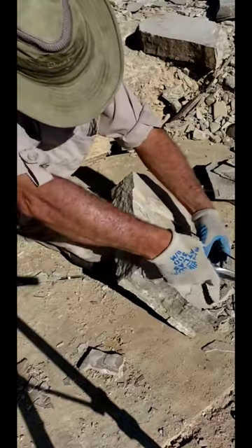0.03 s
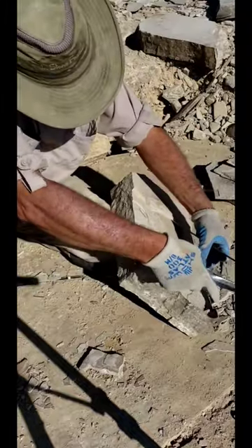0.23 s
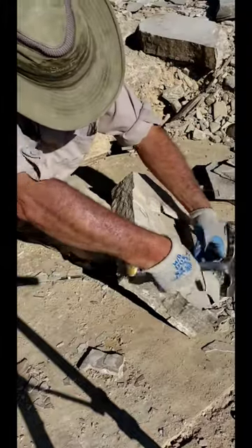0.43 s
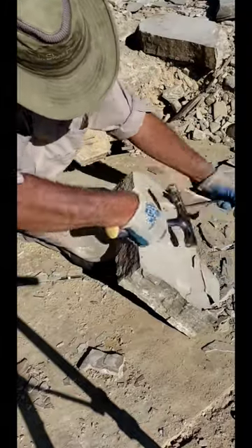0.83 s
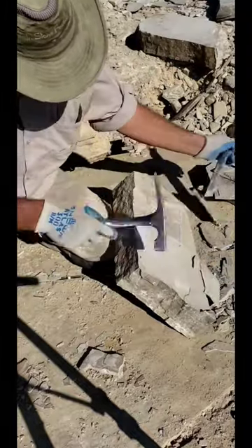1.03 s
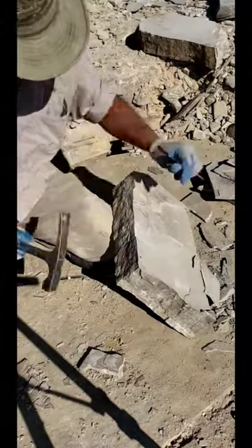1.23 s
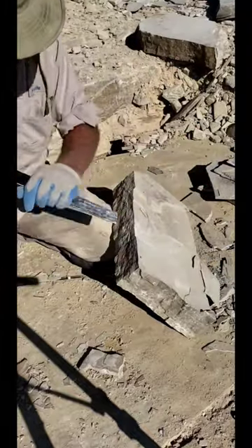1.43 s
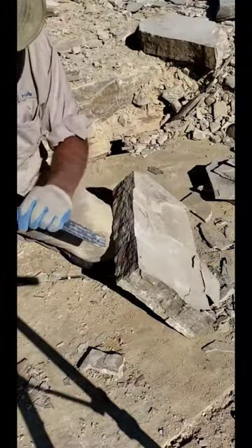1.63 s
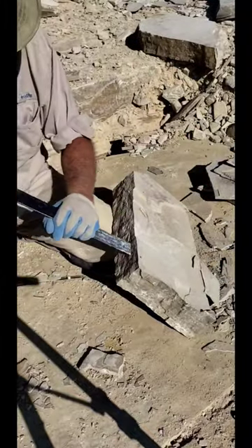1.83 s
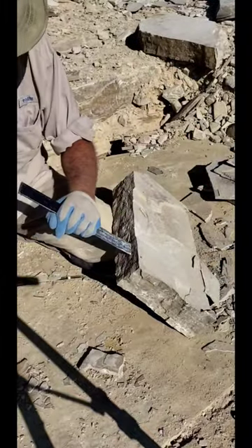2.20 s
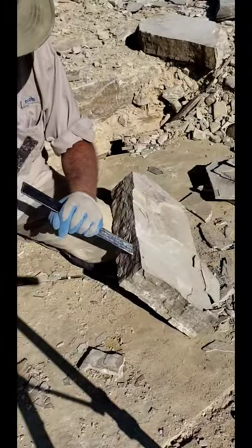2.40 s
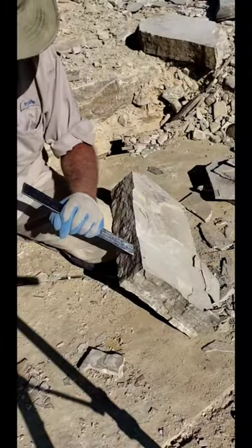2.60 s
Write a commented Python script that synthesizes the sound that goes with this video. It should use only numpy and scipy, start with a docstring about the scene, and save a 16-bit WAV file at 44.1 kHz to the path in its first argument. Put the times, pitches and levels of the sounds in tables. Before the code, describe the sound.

Close by in a quiet quarry, two ringing hammer blows drive a chisel into stone. Gritty scraping and tool knocks follow, then a pause and a last, duller blow, while an engine hums faintly far away.

```python
"""A quiet quarry, with a stereo microphone close to a stone slab and the work a little to the left.
A hammer drives a steel chisel into the slab: each blow cracks, rings and crumbles a little stone.
Between the blows the tools scrape over the slab, are put down, and the chisel is set again.
Rock faces return a faint echo; an engine hums far away."""
import sys
import numpy as np
from scipy import signal
from scipy.fft import rfft, irfft
from scipy.io import wavfile

SR = 44100
rng = np.random.default_rng(int(sys.argv[2]) if len(sys.argv) > 2 else 0)


def bounce(signal):
    """Save signal as a 16-bit WAV file at the path given by the first command-line argument."""
    frames = np.transpose(np.atleast_2d(signal))
    limited = np.clip(frames, -1, 1)
    pcm = np.round(limited * 32767).astype(np.int16)
    wavfile.write(sys.argv[1], SR, pcm)


N = 121275
LEAD = SR // 4   # samples ahead of time zero, room for an earlier blow
TIME = np.arange(-LEAD, N) / SR

# the slab's dull thud under the chisel: frequency_hz, level_db
THUD_SPECTRUM = [(50, -26.5), (90, -6.5), (120, 5), (220, -8), (400, -14.5), (900, -30), (3000, -58.5)]
THUD_T60_S = 0.17


def hammer_blows():
    """Close up, steel ticks on steel, the chisel rings, the stone cracks and thuds, and grit crumbles."""
    # the blows, the first heard only by its echo: start_s, ring_db, ring_rise_s, ring_hold_s, ring_t60_s,
    # twin_db, modes_db, crack_db, crumble_db, crumble_rise_s, crumble_hold_s, thud_db, stone_hz, stone_db
    blows = [(-.1, -14.5, 0.0011, 0.012, .1, -5, -22, -19, -24, 0.0064, 0.016, -40.5, 1100, -25),
             (0.216, -16.5, .004, .018, 0.069, -9, -24, -21, -24.5, 0.0021, .016, -38, 1064, -23.5),
             (0.502, -15, 0.00047, 0.00091, .11, -23, -17.5, -25.5, -23.5, 0.008, 0.028, -44.5, 1245, -26.5),
             (2.467, -26.5, .002, 0.0016, 0.12, -15, -29, -17, -26.5, 0.0016, 0.0072, -39.5, 810, -31)]
    # the chisel's other modes, damped by the hand like its main ring: pitch_hz, level_db
    chisel_modes = [(1593, -23), (2181, -24.5), (3403, -21), (4046, -10), (5150, -18), (6405, -21.5),
                    (7210, -22), (7400, -17), (8122, -19.5), (9089, -17), (9305, -16.5), (11085, -14.5),
                    (12738, -15), (13102, -19.5), (13905, -18.5)]
    # cracking stone: frequency_hz, level_db
    crack_spectrum = [(100, -14), (250, 7), (620, -3.5), (1000, -4.5), (1500, -7.5), (3000, -1.5),
                      (5500, 3), (8000, -0.5), (12000, 1.5), (14500, 4.5), (16000, -9)]
    # grit crushed under the edge: frequency_hz, level_db
    crumble_spectrum = [(150, -21.5), (600, -2.5), (1200, -7.5), (2200, 2), (4300, -8.5), (5100, 4.5),
                        (6200, -8.5), (7300, -1.5), (9500, 1.5), (13000, 0.5), (14500, -4), (16000, -22.5)]
    chisel_hz, beat_hz = 3591, 105   # the second bending plane rings a little higher: a beating twin
    out = np.zeros((2, len(TIME)))
    for (start, ring_db, rise, hold, t60, twin_db, modes_db, crack_db,
         crumble_db, crumble_rise, crumble_hold, thud_db, stone_hz, stone_db) in blows:
        ring = mode(chisel_hz, ring_db, t60, hold, rise)
        ring += mode(chisel_hz + beat_hz, ring_db + twin_db, t60, hold)
        ring += sum(mode(hz, modes_db + db + rng.normal(0, 1.2), t60, hold) for hz, db in chisel_modes)
        tick = from_db(crack_db + 2.5) * noise(crack_spectrum) * envelope(rise=0.0015, hold=0, t60=0.0027)
        crack = from_db(crack_db) * noise(crack_spectrum, grain_db=2, ripple_db=5)
        crack *= envelope(rise=0.00047, hold=0.0044, t60=0.038)
        crumble = from_db(crumble_db) * noise(crumble_spectrum, grain_db=2.2, ripple_db=10.5)
        crumble *= envelope(crumble_rise, crumble_hold, t60=0.083)
        thud = from_db(thud_db) * noise(THUD_SPECTRUM) * envelope(rise=0.015, hold=0.018, t60=THUD_T60_S)
        stone_ring = mode(stone_hz, stone_db, t60=0.024)
        add(out, start, ring + tick + crack + crumble + thud + stone_ring)
    return out


def knocks():
    """Tools and chips knock on stone: short bursts, each with a broad resonance and a low body."""
    # contacts with the stone: start_s, level_db, t60_s, resonance_hz, resonance_db, body_db
    contacts = [(0.394, -61, 0.16, 1000, 17.5, 6), (0.582, -45, 0.15, 2200, 8, 0.5),
                (0.852, -46, 0.13, 3000, -6.5, -2), (.881, -41.5, 0.072, 1800, 19, -2.5),
                (0.901, -54.5, 0.14, 1600, 1, -4), (.945, -51, 0.1, 1500, 14.5, 0),
                (0.976, -56.5, 0.05, 1800, 19, 5), (1.096, -47, .14, 8940, 17, 8.5),
                (1.142, -35, 0.074, 1815, 9.5, -26.5), (1.2243, -25, 0.027, 2130, 19.5, 4),
                (1.256, -57.5, 0.082, 2300, -14, -2.5), (1.315, -58.5, 0.043, 5500, 26, 22.5),
                (1.367, -66.5, 0.1, 5200, 22, -4), (1.978, -51.5, 0.11, 850, 13, 4.5),
                (2.249, -77, 0.039, 1000, 23, 0)]
    # the stony colour common to all knocks: frequency_hz, level_db
    knock_spectrum = [(80, -13), (250, 12.5), (600, -2.5), (1500, -3), (4000, 1), (6500, 0.5), (8000, -4.5),
                      (12000, -2), (14500, -4), (16000, -15)]
    body_hz, width_octaves = 277, 0.59
    hz = np.geomspace(50, 16000, num=60)
    out = np.zeros((2, len(TIME)))
    for start, db, t60, resonance_hz, resonance_db, body_db in contacts:
        humps_db = sum(height_db * np.exp(-0.5 * (np.log2(hz / centre_hz) / width_octaves) ** 2)
                       for centre_hz, height_db in ((resonance_hz, resonance_db), (body_hz, body_db)))
        burst = noise(np.c_[hz, at_hz(knock_spectrum, hz) + humps_db], grain_db=1, ripple_db=4)
        add(out, start, from_db(db) * burst * envelope(rise=0.001, hold=0.0025, t60=t60))
    return out


def chisel_set_down():
    """The chisel's edge is set on the slab and bounces once, with a light ring and a thud each time."""
    # the touch and its bounce: start_s, ring_db, thud_db
    touches = [(1.978, -55, -50), (1.988, -54.5, -54.5)]
    # the chisel's modes in a loose grip: pitch_hz, level_db, t60_s
    loose_modes = [(894, -1, .07), (2256, 0, .075), (4048, -6, .13), (5135, -1, .09), (6223, -8, .09),
                   (7208, -7, .1), (7680, -5, .06), (8390, -4, .06), (9028, -4, .07), (9760, -10, .09),
                   (12620, -17, .1)]
    out = np.zeros((2, len(TIME)))
    for start, ring_db, thud_db in touches:
        ring = sum(mode(hz, ring_db + db + rng.normal(0, 1), t60) for hz, db, t60 in loose_modes)
        thud = noise(THUD_SPECTRUM) * envelope(rise=0.0066, hold=0.0059, t60=THUD_T60_S)
        add(out, start, ring + from_db(thud_db) * thud)
    return out


def hammer_shimmer():
    """The hammer head's closely spaced modes shimmer faintly after a touch."""
    # touches on the head: start_s, level_db, t60_s
    touches = [(0.581, -44, 0.17), (1.226, -68.5, 1)]
    # the head's narrow band of modes: frequency_hz, level_db
    head_spectrum = [(7800, -44), (8700, -6.5), (9000, -4), (9300, 0), (9600, -10), (10500, -45)]
    out = np.zeros((2, len(TIME)))
    for start, db, t60 in touches:
        shimmer = noise(head_spectrum, ripple_db=3) * envelope(rise=0.001896, hold=0, t60=t60)
        add(out, start, from_db(db) * shimmer)
    return out


def scrape():
    """Grit hisses and grinds under the sliding steel and sets the slab ringing."""
    # course of the bright hiss: time_s, level_db
    hiss_levels = [(.74, -89), (.82, -54.5), (.86, -51), (.92, -74), (.95, -60), (1.02, -80),
                   (1.085, -63.5), (1.105, -52), (1.14, -35), (1.16, -58), (1.185, -53.5), (1.215, -62),
                   (1.26, -64.5), (1.34, -70.5), (1.42, -96)]
    # course of the low grinding: time_s, level_db
    grind_levels = [(.76, -100), (.84, -60), (.885, -47.5), (.925, -54.5), (.96, -58), (1.02, -80),
                    (1.085, -81), (1.105, -58.5), (1.15, -59), (1.18, -61.5), (1.215, -70), (1.25, -56),
                    (1.33, -101.5)]
    # hissing grit: frequency_hz, level_db
    hiss_spectrum = [(800, -53.5), (2500, -10), (4500, -3), (5400, -5), (5850, -10), (6500, -2),
                     (7700, -0.5), (9500, -3), (11000, 0.5), (12600, 4), (13500, -1.5), (14500, -1),
                     (16000, -13.5)]
    # grinding grit: frequency_hz, level_db
    grind_spectrum = [(70, 8), (150, 13.5), (300, -3.5), (800, -3), (1600, -2), (3000, 1.5), (5000, -21),
                      (12000, -32)]
    # the slab's resonances under a tool: centre_hz, width_hz, gain_db
    slab_peaks = [(526, 130, 9), (1180, 160, -2.5), (1500, 150, 1.5), (1820, 350, 4), (2280, 250, 2.5),
                  (3050, 250, -3.5)]
    hiss = noise(hiss_spectrum, len(TIME), grain_db=4.2, ripple_db=14)
    grind = noise(grind_spectrum, len(TIME), grain_db=4, ripple_db=13, peaks=slab_peaks)
    return gain_curve(hiss_levels) * hiss + gain_curve(grind_levels) * grind


def ground_bumps():
    """Hand and knee bump softly on the ground, one low damped tone each."""
    # the bumps: start_s, pitch_hz, level_db, t60_s
    bumps = [(0.167, 80, -32.5, .13), (0.699, 115, -47.5, 0.1), (1.056, 72, -36, .14),
             (1.097, 70, -40, .12)]
    out = np.zeros((2, len(TIME)))
    for start, hz, db, t60 in bumps:
        add(out, start, mode(hz, db, t60, rise=0.004))
    return out


def rock_echo(work):
    """Scattered returns from rubble and rock faces reach the microphone, hold, then fade ever faster."""
    # colour of the returns: frequency_hz, level_db
    echo_spectrum = [(100, -3), (500, -5), (1500, -4), (4000, -0.5), (8000, 5.5), (14000, -7.5)]
    echo_db, rise_s, hold_s, fade_db_per_s2 = -30, 0.016, 0.065, 2200.5
    t = np.arange(SR // 2) / SR
    fade = np.minimum(t / rise_s, 1) * from_db(-fade_db_per_s2 * np.maximum(t - hold_s, 0) ** 2)
    response = noise(echo_spectrum, grain_db=3.5) * fade
    response /= np.sqrt(np.sum(response ** 2, axis=1, keepdims=True))
    mono = work.mean(axis=0, keepdims=True)
    return from_db(echo_db) * signal.fftconvolve(mono, response, axes=1)[:, :len(TIME)]


def distant_engine():
    """Far from the microphone, an engine's hum wavers in level over low rumble and faint air."""
    # tones of the hum: pitch_hz, level_db
    hum_tones = [(65.1, -53), (97.6, -68)]
    # rumble and air: frequency_hz, level_db
    rumble_spectrum = [(20, -25), (32, -14.5), (48, 7.5), (72, 0), (95, -14), (130, -21), (200, -23),
                       (400, -37), (1000, -44.5), (4000, -48.5), (9000, -53.5), (13000, -44),
                       (16000, -51.5)]
    out = from_db(-59) * noise(rumble_spectrum, len(TIME))
    knots_s = np.linspace(TIME[0], TIME[-1], num=30)
    for hz, db in hum_tones:
        waver_db = 0.89 * np.interp(TIME, knots_s, rng.standard_normal(len(knots_s)))
        out += abs(microphone_pair(hz)) * from_db(db + waver_db) * np.sqrt(2) * np.sin(2 * np.pi * hz * TIME)
    return out


def microphone_pair(hz):
    """Complex gains of the two channels: the left is louder and leads in phase."""
    # level of left over right: frequency_hz, level_db
    left_level = [(60, 3.5), (99, 6), (160, 4.5), (270, 3), (450, 2), (740, 3.5), (1220, 2), (2010, 2.5),
                  (3330, 4), (5500, 10.5), (9080, 10), (15000, 4.5)]
    # phase of left ahead of right: frequency_hz, lead_rad
    left_lead = [(0, 0), (2240, 0.27), (3270, 5.5), (6200, 10.5), (7410, 6), (9040, 0.5), (9990, 4),
                 (11000, 11.5), (14100, 11.5), (15300, 20.5)]
    hz = np.atleast_1d(hz)
    left = from_db(at_hz(left_level, hz))
    turn = np.exp(0.5j * at_hz(left_lead, hz))
    return 2 * np.array([left * turn, 1 / turn]) / (1 + left)


def noise(spectrum, size=SR // 2, grain_db=0, ripple_db=0, peaks=()):
    """Stereo noise, mid rms one; grain_db adds uneven grains, ripple_db chance resonances, peaks set ones."""
    # stereo width: frequency_hz, side_to_mid_ratio
    width = [(40, 1.0), (110, .7), (250, .35), (2000, 0.75), (12000, 0.76)]
    grain_samples, ripple_hz = 24, 171.2   # ripple_hz spaces the stone's many short resonances
    hz = np.fft.rfftfreq(size, 1 / SR)
    grains = np.minimum(rng.exponential(1, size // grain_samples + 1), 5)
    grain_gain = from_db(grain_db * np.repeat(grains, grain_samples)[:size])
    mid, side = rfft(rng.standard_normal((2, size)) * grain_gain)
    ripple = np.interp(hz / ripple_hz, np.arange(400), rng.uniform(-1, 1, 400))
    colour_db = at_hz(spectrum, hz) + ripple_db * ripple * np.minimum(hz / (10 * ripple_hz), 1)
    colour_db += sum(db / (1 + (2 * (hz - centre_hz) / width_hz) ** 2) for centre_hz, width_hz, db in peaks)
    channels = mid + at_hz(width, hz) * side * [[1], [-1]]
    x = irfft(channels * from_db(colour_db) * microphone_pair(hz), size)
    return x / x.mean(axis=0).std()


def mode(hz, db, t60, hold=0, rise=0.0003):
    """One ringing partial as the two channels hear it."""
    shape = envelope(rise, hold, t60)
    phase = 2 * np.pi * hz * np.arange(len(shape)) / SR
    return from_db(db) * np.sqrt(2) * shape * np.imag(microphone_pair(hz) * np.exp(1j * phase))


def envelope(rise, hold, t60):
    """Rise, hold, then fall 60 dB per t60; all times in seconds."""
    t = np.arange(SR // 2) / SR
    return np.minimum(t / rise, 1) * from_db(-60 * np.maximum(t - hold, 0) / t60)


def gain_curve(points):
    """Gain through (time_s, level_db) points, silent outside them."""
    return from_db(np.interp(TIME, *np.transpose(points), left=-np.inf, right=-np.inf))


def at_hz(points, hz):
    """Read a table on a log-frequency axis."""
    points_hz, values = np.transpose(points)
    return np.interp(np.log(hz + 0.0012), np.log(points_hz), values)


def from_db(db):
    """Decibels to gain."""
    return 10 ** (np.asarray(db) / 20)


def add(out, start_s, sound):
    """Mix a sound in at its time."""
    start = max(int(start_s * SR) + LEAD, 0)
    part = sound[:, :out.shape[1] - start]
    out[:, start:start + part.shape[1]] += part


def scene():
    """The slab in front, the rock faces around it and the engine far off."""
    work = hammer_blows() + knocks() + chisel_set_down() + hammer_shimmer() + scrape() + ground_bumps()
    return (work + rock_echo(work) + distant_engine())[:, LEAD:]


def record(dry):
    """Behind the microphone, peaks are rounded and the highest treble is cut."""
    cutoff_hz = 14750
    lowpass = signal.ellip(10, 0.3, 80, cutoff_hz, fs=SR, output="sos")
    return signal.sosfilt(lowpass, 0.75 * np.tanh(dry / 0.85))


dry = scene()
out = record(dry)
bounce(out)
```